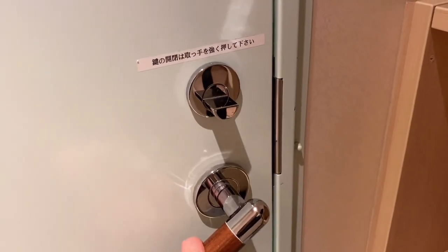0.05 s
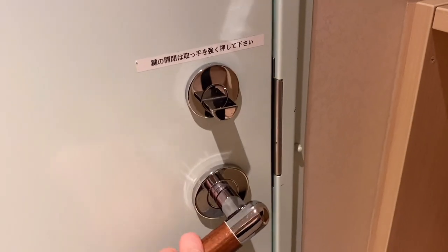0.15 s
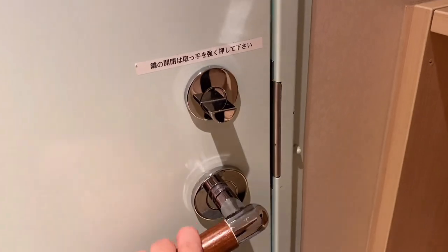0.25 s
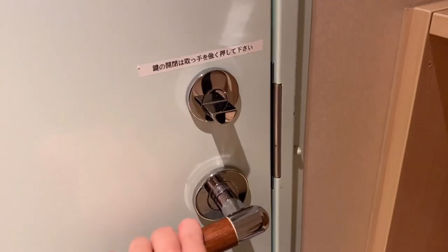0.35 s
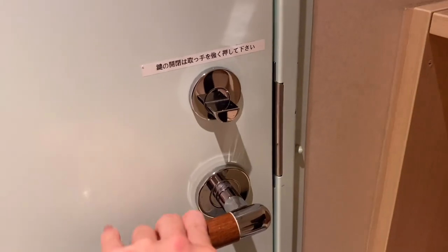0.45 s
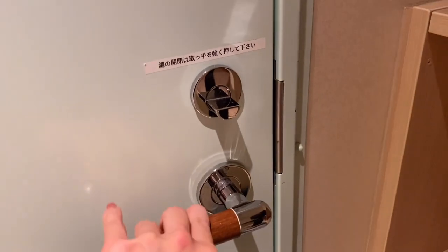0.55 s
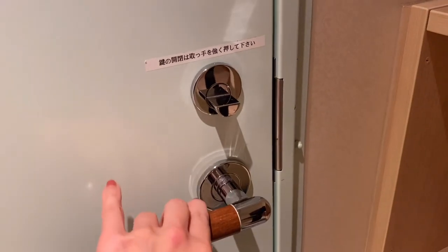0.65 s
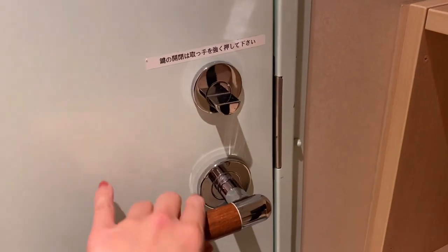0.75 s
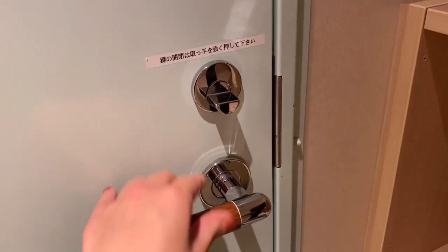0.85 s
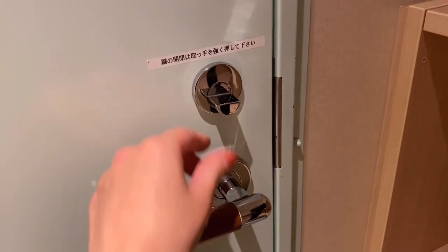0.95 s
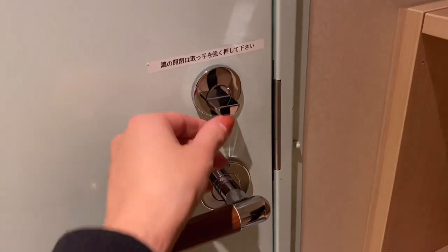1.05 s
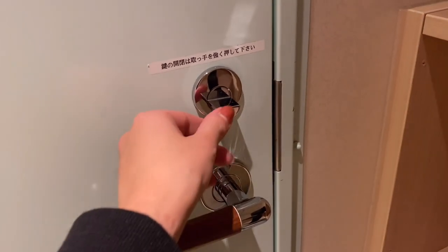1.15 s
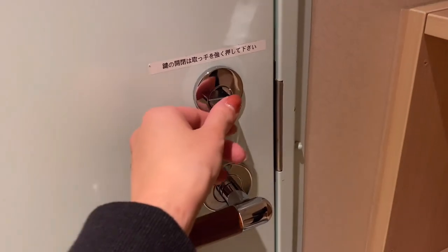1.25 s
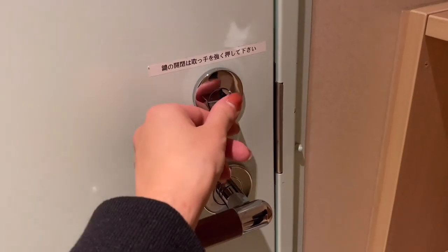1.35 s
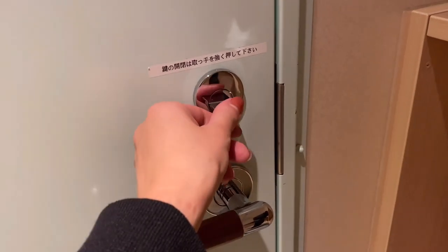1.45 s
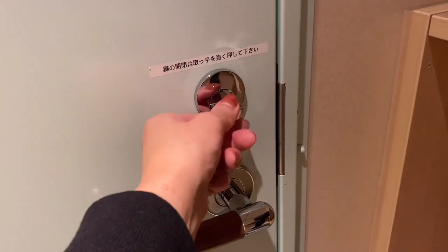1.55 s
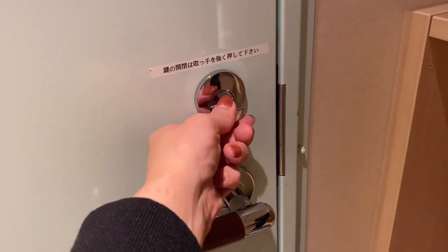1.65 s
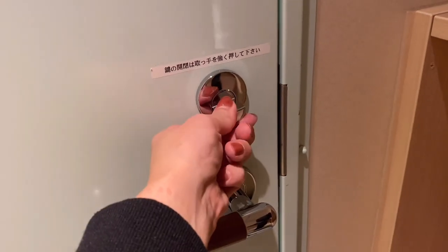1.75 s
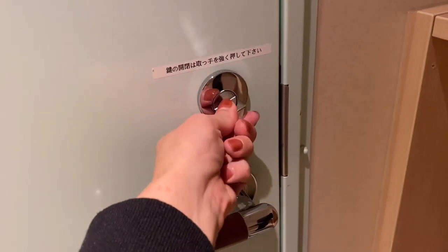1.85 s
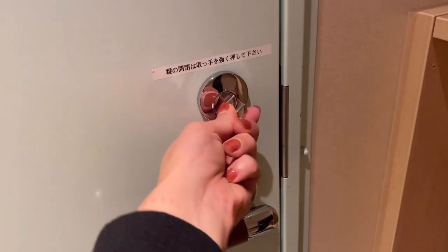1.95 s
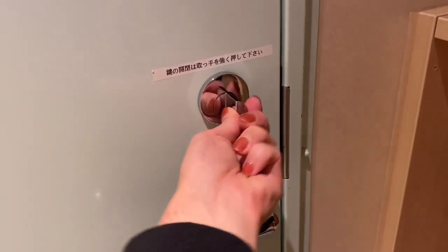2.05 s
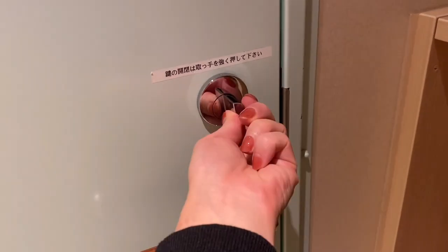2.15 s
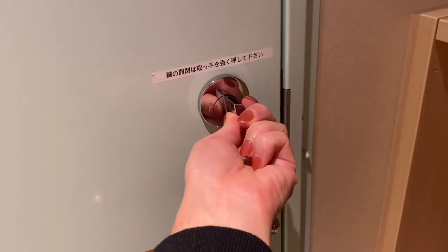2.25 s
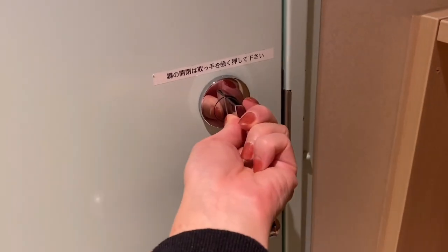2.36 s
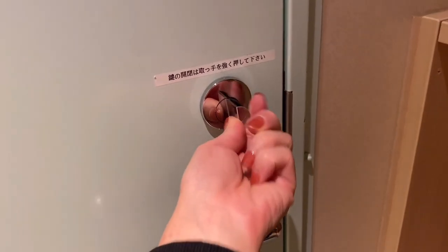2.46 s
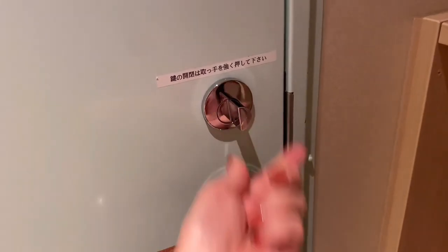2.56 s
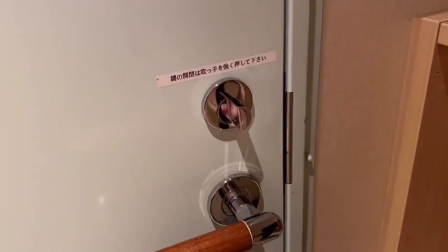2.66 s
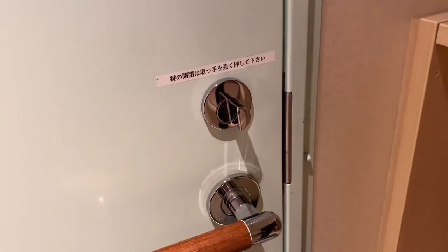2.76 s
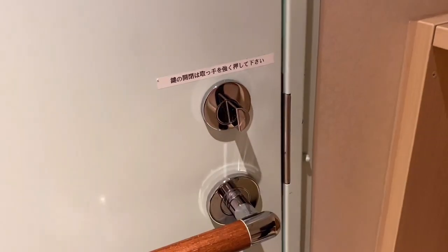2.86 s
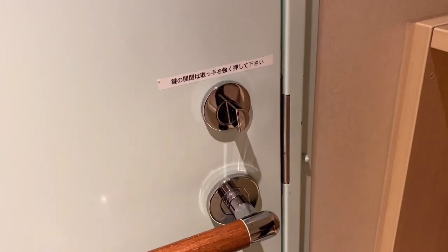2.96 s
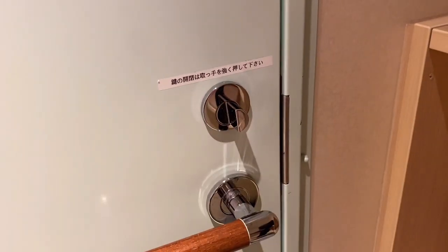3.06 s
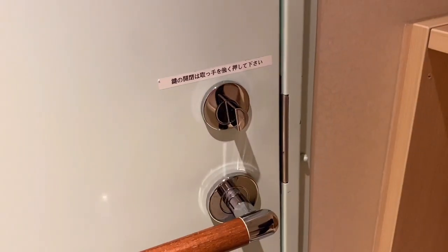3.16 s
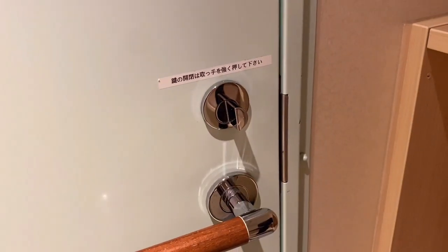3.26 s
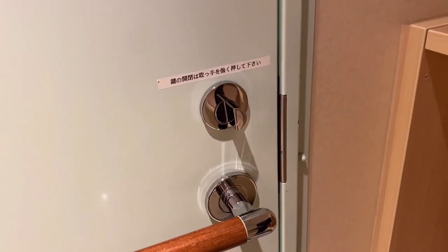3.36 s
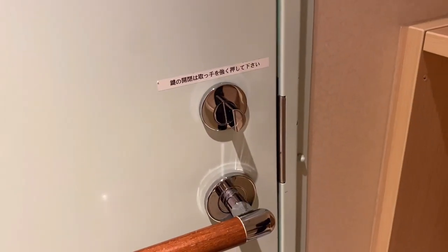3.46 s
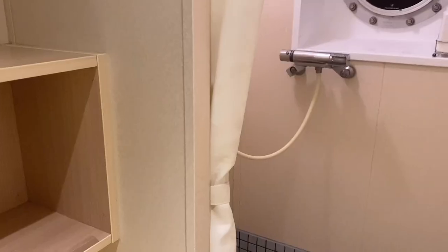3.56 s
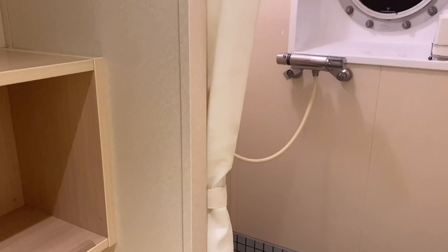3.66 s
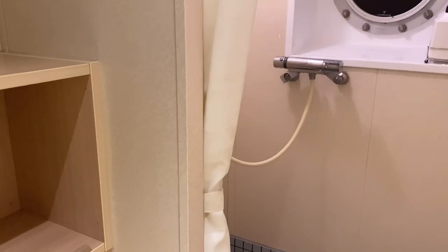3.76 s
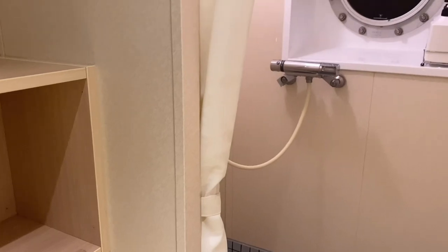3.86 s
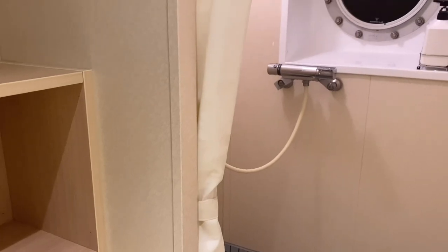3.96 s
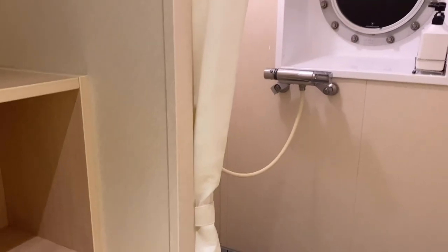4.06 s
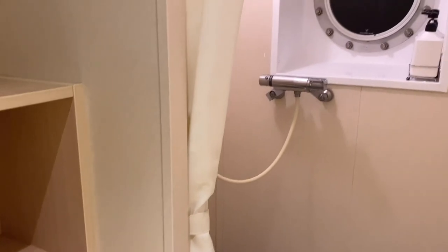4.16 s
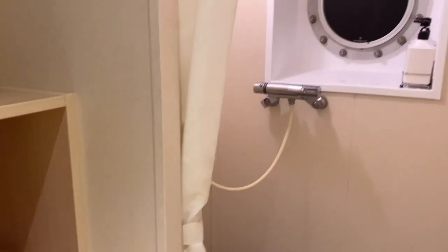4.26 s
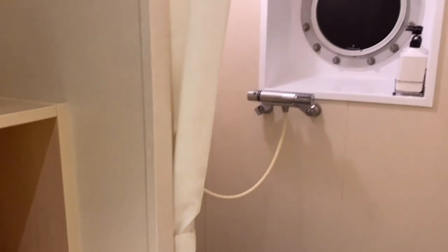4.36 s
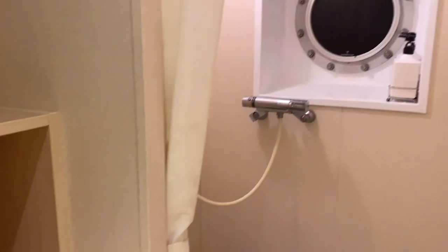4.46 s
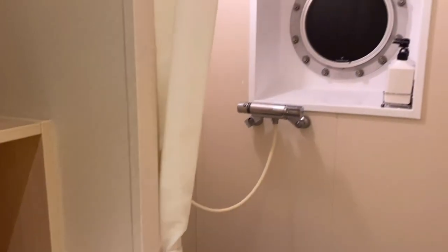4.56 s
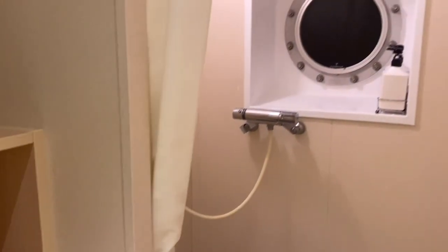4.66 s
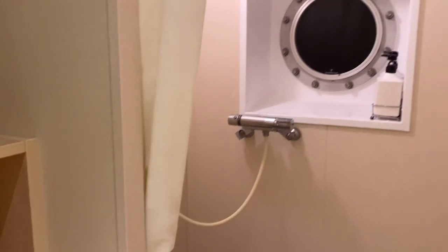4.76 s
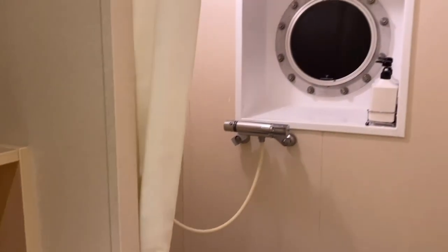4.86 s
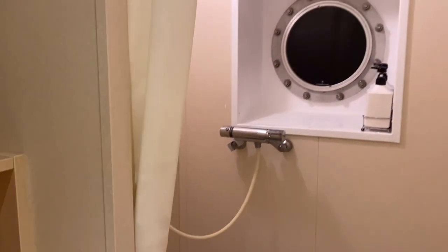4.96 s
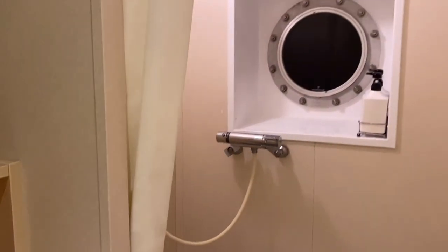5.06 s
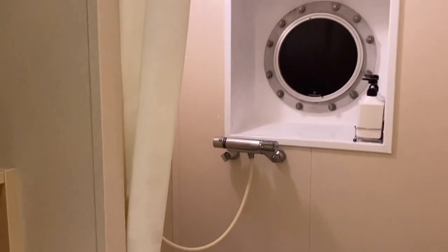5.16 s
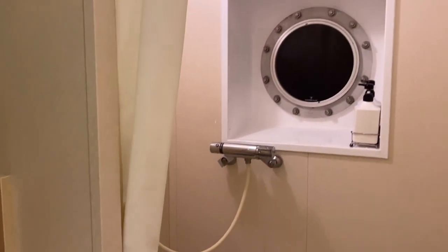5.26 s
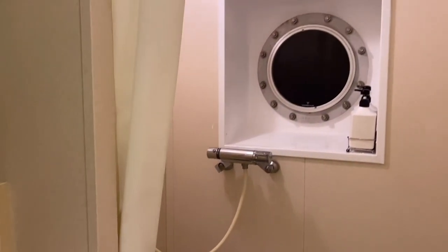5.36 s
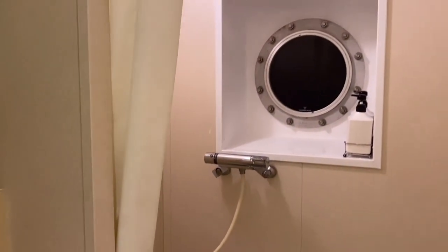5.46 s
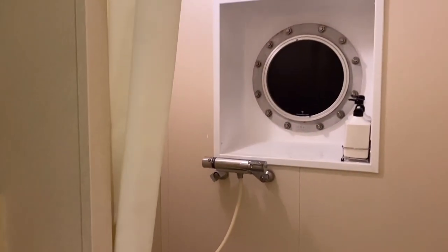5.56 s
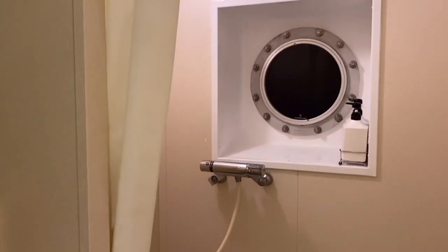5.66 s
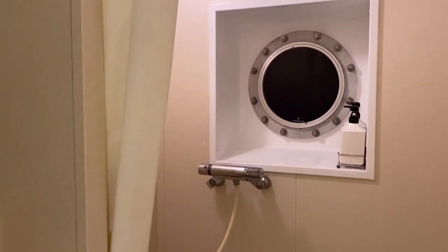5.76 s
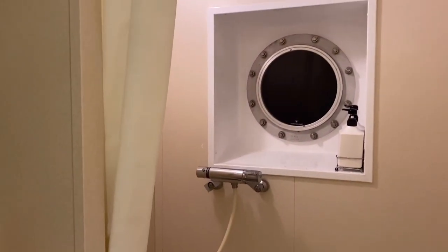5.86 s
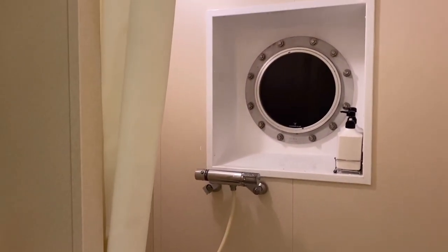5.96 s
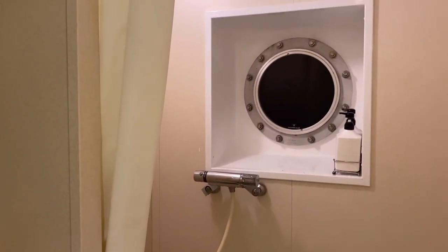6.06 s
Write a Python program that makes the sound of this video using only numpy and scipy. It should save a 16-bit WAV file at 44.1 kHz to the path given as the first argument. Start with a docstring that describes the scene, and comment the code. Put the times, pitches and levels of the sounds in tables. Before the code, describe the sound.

A metal door lever clacks and rattles in a small hard room, then a lock bolt slams home with a bright ring and ping.

```python
"""A hand rattles the lever handle of a thin door in a small hard-walled cabin, then turns the thumb-turn lock.
The bolt slides and lands hard at 2 s, a small metal part pings at 2.5 s, fingers tap the microphone housing;
from 4.2 s lock and lever move again, softer. Contacts are noise bursts that ring the metal; soft filtered
clicks ring the door leaf; all but its lowest boom die in the room. Low rumble, drone and hiss, all filtered
noise, lie below."""
import sys
import numpy as np
from scipy import signal
from scipy.fft import rfft, irfft, next_fast_len
from scipy.io import wavfile

SR = 44100
rng = np.random.default_rng(int(sys.argv[2]) if len(sys.argv) > 2 else 0)


def output_pcm(signal):
    """Save a mono or channel-first signal as 16-bit PCM at the path in sys.argv[1].

    Samples are clipped to [-1, 1] before scaling.
    """
    pcm = np.clip(np.atleast_2d(signal).T, -1, 1) * 32767
    wavfile.write(sys.argv[1], SR, np.round(pcm).astype(np.int16))


N = 269670
SIZE = next_fast_len(N + SR)
FREQS = np.arange(SIZE // 2 + 1) * SR / SIZE

# Colour of a contact by band. Each row: low edge in Hz, high edge in Hz, lever gain in dB, lock gain in dB.
CONTACT_BANDS = [(515, 1042, 8.5, 7), (1200, 2410, 3, 4.5), (2320, 4580, 8, 4), (4280, 6320, -6, 0.5),
                 (7520, 22000, -7.5, -8.5)]


def amp(db):
    """dB to gain."""
    return 10 ** (np.asarray(db) / 20)


def rms_one(x):
    """Scale to rms 1."""
    return x / np.sqrt(np.mean(x ** 2) + 1e-20)


def in_time(rows):
    """Table columns as curves, one value a sample."""
    s, *columns = np.transpose(rows)
    return [np.interp(np.arange(N) / SR, s, c) for c in columns]


def at_hz(points):
    """A (Hz, value) table on the transform grid, log axis."""
    hz, value = np.transpose(points)
    return np.interp(np.log(FREQS + 1), np.log(hz), value)


def band(x, low_hz, high_hz):
    """Causal band-pass."""
    sos = signal.butter(2, [low_hz, high_hz], "band", fs=SR, output="sos")
    return signal.sosfilt(sos, x + 1e-18)


def coloured(spectrum):
    """Two unrelated noises with this spectrum, jointly scaled to rms 1."""
    white = rng.standard_normal((2, SIZE))
    return rms_one(irfft(rfft(white) * amp(at_hz(spectrum)), SIZE)[:, :N])


def ring(x, modes):
    """Sum of decaying modes of alternating sign, t60 at least 10 ms; a unit click rings each at its level."""
    out = 0
    for k, (hz, db, t60_s) in enumerate(modes):
        r = amp(-60 / (max(t60_s, .01) * SR))
        w = 2 * np.pi * hz / SR
        gain = (-1) ** k * amp(db) * np.sin(w)
        out = out + signal.lfilter([0, gain], [1, -2 * r * np.cos(w), r * r], x + 1e-18)
    return out


def resonate(x, peaks):
    """Noise through parallel resonances, each with its gain at the peak."""
    out = 0
    for hz, width_hz, db in peaks:
        r = np.exp(-np.pi * width_hz / SR)
        poles = [1, -2 * r * np.cos(2 * np.pi * hz / SR), r * r]
        out = out + amp(db) * signal.lfilter([(1 - r * r) / 2, 0, (r * r - 1) / 2], poles, x)
    return out


def clicks(times_s, db):
    """One impulse per event."""
    out = np.zeros(N)
    np.add.at(out, (np.maximum(times_s, 0) * SR).astype(int), amp(db))
    return out


def metal_contacts(table, colour_db, rattle_s, uneven_db):
    """Each contact is a decaying rattle of uneven micro-contacts, coloured by band and tilted in brightness."""
    pivot_hz, rise_s = 3000, .0012
    chatter_db, chatter_s = -18.5, 0.026   # loose parts chatter on after each contact
    s, contact_db, bright, _ = np.transpose(table)
    low, high = np.transpose(CONTACT_BANDS)[:2]
    octaves = np.log2(np.sqrt(low * high) / pivot_hz)
    t = np.arange(SR // 5) / SR
    decay = np.exp(-t / rattle_s) + amp(chatter_db) * np.exp(-t / chatter_s)
    shape = (1 - np.exp(-t / rise_s)) * decay
    layers = np.zeros((5, N + len(t)))
    for at, db, tilt in zip((np.maximum(s, 0) * SR).astype(int), contact_db, bright):
        unevenness = np.repeat(rng.standard_normal(len(t) // 20), 20)   # new level every 20 samples
        burst = rng.standard_normal((5, len(t))) * amp(uneven_db * unevenness) * shape
        burst *= np.linalg.norm(shape) / np.linalg.norm(burst, axis=1, keepdims=True)   # even energy
        layers[:, at:at + len(t)] += amp(db + colour_db + tilt * octaves)[:, None] * burst
    return sum(band(x[:N], lo, hi) for x, lo, hi in zip(layers, low, high))


def door_leaf(table, thump_db, boom_db):
    """Soft pushes ring the leaf: thud, then thump, then boom, each later and lower in pitch."""
    # Each row: mode in Hz, level in dB, t60 in s.
    thud_modes = [(271, -4, 0.13), (324, 3, 0.055), (357.1, -4.5, 0.2), (428.3, 1.5, 0.047),
                  (483.5, -6, 0.058), (508.6, -11.5, 0.17)]
    thump_modes = [(126.4, -5, 0.06), (164, 1.5, 0.29), (224.4, -3, 0.089)]
    boom_modes = [(62, -9, 0.7), (81.28, -2, 0.44), (112.9, -13, 0.25)]
    thud_db = -1
    s, _, _, push_db = np.transpose(table)
    late = s + .004      # the leaf answers after the metal
    thud = ring(band(clicks(late, push_db + thud_db), 200, 780), thud_modes)
    thump = ring(band(clicks(late + .006, push_db + thump_db), 90, 210), thump_modes)
    boom = ring(band(clicks(late + .012, push_db + boom_db), 30, 150), boom_modes)
    return thud + thump, boom


def lever_handle():
    """The lever on its stops: contacts ring the handle fittings, pushes ring the leaf; boom apart."""
    # Each row: start in s, contact level in dB, brightness in dB per octave, push on the leaf in dB.
    lever_hits = [(0.0, -41, -1.5, -45), (0.075, -43, 2, -22), (0.109, -35.5, 4, -37),
                  (0.1494, -32.5, 2, -26.5), (0.2644, -48, -9.5, -48), (0.7084, -43, 4, -56),
                  (0.7153, -30.5, -4.5, -34.5), (0.7344, -23, 1, -28), (0.7798, -50, -8, -40),
                  (0.8475, -43.5, -6, -41.5), (0.8714, -30, 1, -32.5), (0.9772, -31.5, 1.5, -36),
                  (1.0604, -41.5, -1.5, -41), (1.1044, -43, 3.5, -42.5), (1.1494, -69, 3, -49.5),
                  (4.4074, -61.5, -1, -49), (4.4937, -37, -2.5, -45), (4.556, -43, -2, -59),
                  (4.6454, -52.5, -5, -64), (4.6897, -40, -2.5, -55), (4.7815, -44.5, -4, -45.5),
                  (4.8574, -39, -1.5, -43), (4.9212, -43.5, -2.5, -43.5), (5.029, -53, -4.5, -45)]
    # Each row: mode in Hz, level in dB, t60 in s.
    lever_modes = [(1623, -9, 0.049), (1720, 0.5, 0.028), (2100, -22.5, 0.015), (2304, -16.5, 0.0084),
                   (2840, 14, 0.0083), (2822, 9, 0.017), (2970, -9, 0.0077), (2790, 0.5, 0.013),
                   (3180, -5, 0.027), (3580, -19, 0.032), (4860, -24.5, 0.018)]
    colour_db = np.transpose(CONTACT_BANDS)[2]
    contact = metal_contacts(lever_hits, colour_db, rattle_s=0.0035, uneven_db=5.5)
    thud, boom = door_leaf(lever_hits, thump_db=2.5, boom_db=12.5)
    return contact + amp(-31) * ring(contact, lever_modes) + thud, boom


def lock_parts():
    """Latch and lock parts: shorter rattles ring the lock metal, pushes ring the leaf; boom apart."""
    # Each row: start in s, contact level in dB, brightness in dB per octave, push on the leaf in dB.
    lock_hits = [(0.0732, -16, 2, -32.5), (0.0844, -27, -9, -43), (0.398, -43, -9, -36.5),
                 (1.3697, -54, -3.5, -55.5), (1.5638, -45.5, -4.5, -56.5), (1.7977, -44.5, -3, -60),
                 (1.9242, -33.5, -2, -49), (2.0201, -5, 1, -20), (2.0294, -18, -2.5, -36),
                 (2.0691, -23.5, -4, -48), (2.104, -30.5, -1, -29), (4.2274, -46.5, -6, -51),
                 (4.2594, -53.5, -10, -57)]
    # Each row: mode in Hz, level in dB, t60 in s.
    lock_modes = [(856, -15.5, 0.033), (1157, -1.5, 0.025), (1600, -3.5, 0.038), (2090, -14.5, 0.044),
                  (2373, -7.5, 0.022), (2424, 8, .05), (2700, -14, 0.16), (3040, -2, 0.12),
                  (3100, -4, 0.045), (3650, -16, 0.041), (4460, -7.5, 0.038), (5170, -14.5, 0.057),
                  (5700, -5.5, 0.043)]
    colour_db = np.transpose(CONTACT_BANDS)[3]
    contact = metal_contacts(lock_hits, colour_db, rattle_s=0.0026, uneven_db=3.5)
    thud, boom = door_leaf(lock_hits, thump_db=-12, boom_db=-4.5)
    return contact + amp(-54) * ring(contact, lock_modes) + thud, boom


def bolt_slide():
    """Friction noise through the lock-case resonances while the bolt travels."""
    # Each row: time in s, level in dB.
    slide_level = [(1.93, -49), (1.96, -50), (1.985, -43.5), (2.017, -41)]
    # Lock-case resonances. Each row: centre in Hz, width in Hz, gain in dB.
    case_peaks = [(850, 90, -4), (1280, 150, -3), (1700, 600, -14), (2090, 140, 0), (3000, 900, -20),
                  (3750, 100, -14)]
    t = np.arange(N) / SR
    moving = (t > slide_level[0][0]) & (t < slide_level[-1][0])
    friction = rms_one(resonate(rng.standard_normal(N), case_peaks))
    return moving * amp(in_time(slide_level)[0]) * friction


def pings():
    """Small metal part let go: a click and brief rattle ring close modes, over a sharp tick and a knock."""
    # Each row: start in s, ring drive in dB, tick in dB, knock in dB.
    releases = [(2.4708, -26.5, -11.5, -23), (4.3246, -70, -48, -45.5), (4.384, -70, -53, -46),
                (5.091, -68.5, -50, -34)]
    # Each row: mode in Hz, level in dB, t60 in s.
    part_modes = [(4600, -9, 0.012), (5135, -6, .02), (5430, -2.5, 0.033), (5513, 8, 0.0089),
                  (5667, -1, 0.032), (5800, -7.5, .02), (6500, -14, .01)]
    rattle_s, rattle_db = 0.0035, -24.5
    s, ring_db, tick_db, knock_db = np.transpose(releases)
    tick = band(clicks(s, tick_db), 4870, 15000)
    knock = band(clicks(s, knock_db), 300, 2700)
    strike = clicks(s, ring_db)
    fade = np.exp(-np.arange(SR // 20) / SR / rattle_s)
    rattle = np.convolve(strike, fade)[:N] * rng.standard_normal(N)
    return ring(strike + amp(rattle_db) * rattle, part_modes) + tick + knock


def taps():
    """Fingers on the microphone housing: dull pops of one heavily damped mode."""
    # Each row: time in s, level in dB.
    finger_taps = [(1.494, -33), (2.879, -35), (3.004, -37.5), (3.254, -36), (3.329, -40), (3.363, -37),
                   (3.383, -43.5), (3.476, -34), (4.122, -37), (5.461, -39.5)]
    housing_hz, t60_s = 480, .01
    return ring(clicks(*np.transpose(finger_taps)), [(housing_hz, 0, t60_s)])


def room(x):
    """Two diffuse tails of octave-band noise, each band with its own decay; the first adds the direct sound."""
    # Each row: frequency in Hz, t60 in s.
    room_decay = [(100, 0.37), (400, .35), (1500, 0.32), (5000, 0.32), (10000, 0.26), (16000, .12)]
    room_db, build_up_s = -1, 0.0013
    t = np.arange(SR * 3 // 4) / SR
    hz, t60_s = np.transpose(room_decay)
    tail = 0
    for centre in 90 * 2 ** np.arange(8):
        dying = amp(-60 * t / np.interp(np.log(centre), np.log(hz), t60_s))
        noise = rng.standard_normal((2, len(t)))
        tail = tail + band(noise, centre / np.sqrt(2), centre * np.sqrt(2)) * dying
    tail = tail * (1 - np.exp(-t / build_up_s))
    tail = amp(room_db) * tail / np.sqrt(np.sum(tail ** 2, axis=1, keepdims=True))
    tail[1] *= np.sqrt(1 + amp(-2 * room_db))      # matches direct plus tail power of the first
    tail[0, 0] += 1
    return irfft(rfft(x, SIZE) * rfft(tail, SIZE), SIZE)[:, :N]


def rumble():
    """Low rumble in two noise bands; the upper swells with the early door blows as the leaf resonates."""
    # Each row: time in s, 34-55 Hz level in dB, 55.7-81.5 Hz level in dB.
    rumble_levels = [(0.0, -59, -14.5), (0.1, -27, -52), (0.17, -46, -23), (0.54, -41.5, -45.5),
                     (0.73, -55, -34.5), (0.76, -55, -19), (1.26, -47, -39.5), (2.38, -47, -38),
                     (2.53, -40.5, -43.5), (3.44, -48.5, -34.5), (3.66, -51, -46), (4.12, -49.5, -40),
                     (4.36, -28, -40.5), (4.58, -47, -26), (5.39, -38.5, -47.5), (5.46, -46.5, -46),
                     (5.7, -45.5, -35.5), (6.11, -42.5, -45.5)]
    deep_db, low_db = in_time(rumble_levels)
    white = rng.standard_normal((2, 2, N))
    deep = amp(deep_db) * rms_one(band(white[0], 34, 55))
    low = amp(low_db) * rms_one(band(white[1], 55.7, 81.5))
    return deep + low


def drone_and_hiss():
    """Drone and hiss beds; their swells stand for leaf shudder and loose rattle around the door blows."""
    # Each row: time in s, drone level in dB, hiss level in dB.
    bed_levels = [(0.0, -32.5, -56.5), (0.47, -47.5, -67), (0.76, -57.5, -63.5), (0.92, -42.5, -56),
                  (1.14, -49.5, -65), (1.89, -52, -65.5), (2.09, -42, -52), (2.26, -49, -66.5),
                  (4.22, -52, -68), (4.7, -44, -54.5), (5.1, -50, -68), (6.11, -49.5, -64)]
    # Noise spectra before scaling to rms 1. Each row: frequency in Hz, relative density in dB per Hz.
    drone_spectrum = [(59, -30), (100, -15.5), (124, -2), (169, -7.5), (266, -11.5), (329, -13.5),
                      (399, -20.5), (490, -28.5), (785, -24.5), (952, -30.5), (1300, -39), (1690, -50),
                      (2860, -120)]
    hiss_spectrum = [(800, 2), (1200, 1), (1800, -1.5), (2800, -1.5), (3500, -4), (4300, -8.5),
                     (6000, -11.5), (8500, -3.5), (11000, -13), (13000, -19.5), (16000, -18)]
    # Each row: centre in Hz, width in Hz, relative gain in dB.
    drone_peaks = [(160.7, 18, -7), (402, 34, -11), (708, 5.2, -16)]
    bright_until_s, dull_hz = 3.51, 4640   # the top of the hiss drops away from here on
    drone_db, hiss_db = in_time(bed_levels)
    tones = rms_one(band(resonate(rng.standard_normal((2, N)), drone_peaks), 80, 1000))
    drone = coloured(drone_spectrum) + amp(-7.5) * tones
    hiss = coloured(hiss_spectrum)
    dull = signal.sosfilt(signal.butter(3, dull_hz, fs=SR, output="sos"), hiss)
    hiss = np.where(np.arange(N) / SR < bright_until_s, hiss, dull)
    return amp(drone_db) * drone + amp(hiss_db) * hiss


def scene():
    """Left-port sound and a further share for the right; lever, lock and pings get rooms of their own."""
    lever, lever_boom = lever_handle()
    lock, lock_boom = lock_parts()
    struck = room(lever) + room(lock + bolt_slide()) + room(pings())
    roomless = (lever_boom + lock_boom + taps()) * [[1], [.8]]
    return struck + roomless + rumble() + drone_and_hiss()


def record(dry):
    """The right port hears the left sound rescaled and phase-shifted, plus its own share; the top is cut."""
    # How alike the two ports hear. Each row: frequency in Hz, likeness 0-1.
    likeness = [(25, .8), (60, .9), (125, .86), (250, .8), (500, .5), (2000, .5), (4000, .6), (7000, .8),
                (8200, .95), (16000, .95)]
    # Each row: frequency in Hz, left over right in dB.
    left_over_right = [(60, 2.5), (110, 3), (200, 6), (380, 3.5), (700, 3), (1290, 7), (2380, 5.5),
                       (4400, 7), (7000, 3), (8300, 0), (16000, 0)]
    # Each row: frequency in Hz, phase lead of the left port in radians.
    left_leads = [(0, 0), (520, .4), (1210, 4.9), (3100, 8.1), (5250, 7.3), (5600, 6.4), (8100, 3.4),
                  (8870, 2.9), (10500, 0), (11900, -.4), (12500, -2.6), (14300, -3.7), (15400, -6.3),
                  (16100, -6)]
    cutoff_hz, self_noise_db = 16450, -87   # microphone hiss level ahead of the cut
    left, other = rfft(dry, SIZE)
    alike = np.clip(at_hz(likeness), 0, 1)
    lead = np.interp(FREQS, *np.transpose(left_leads))
    mixed = alike * left + np.sqrt(1 - alike ** 2) * other
    right = mixed * amp(-at_hz(left_over_right)) * np.exp(-1j * lead)
    both = irfft(np.array([left, right]), SIZE)[:, :N]
    both = both + amp(self_noise_db) * rng.standard_normal((2, N))
    return signal.sosfilt(signal.cheby2(12, 70, cutoff_hz, fs=SR, output="sos"), both)


dry = scene()
out = record(dry)
output_pcm(out)
```